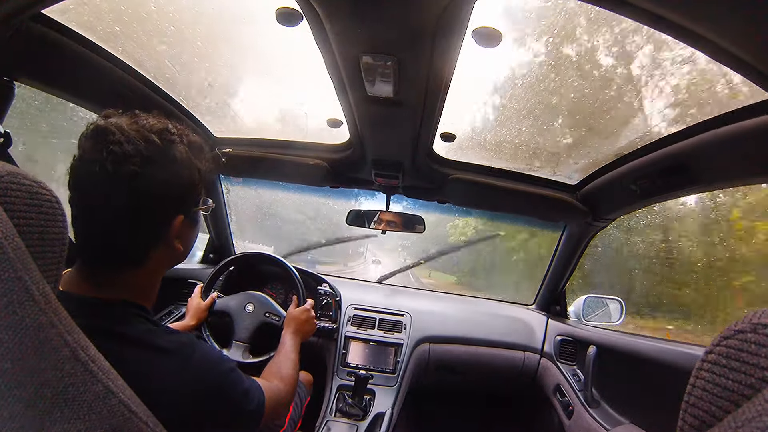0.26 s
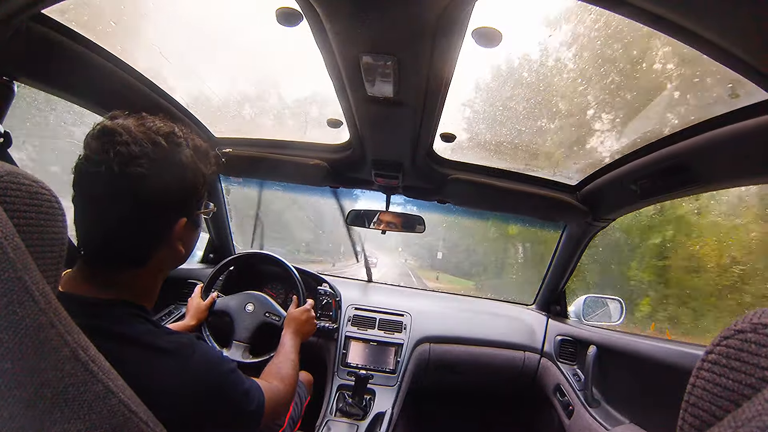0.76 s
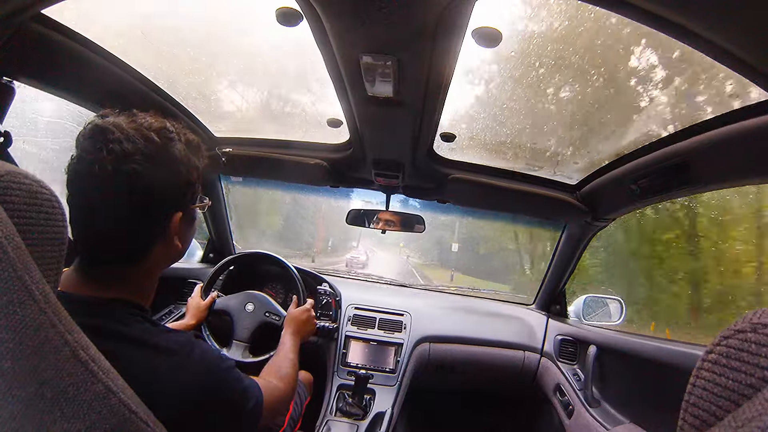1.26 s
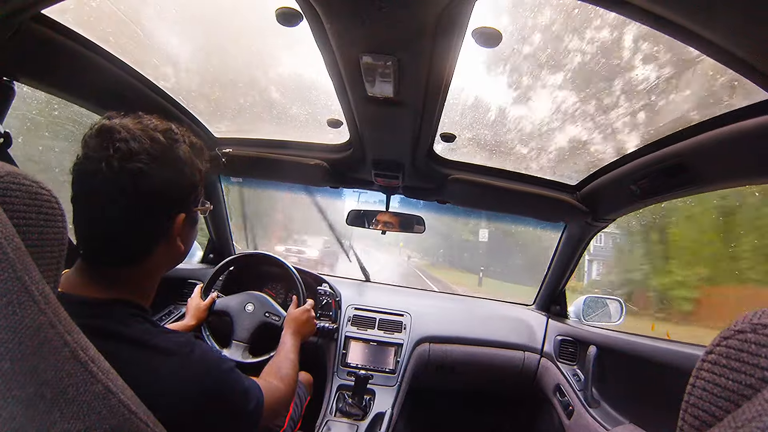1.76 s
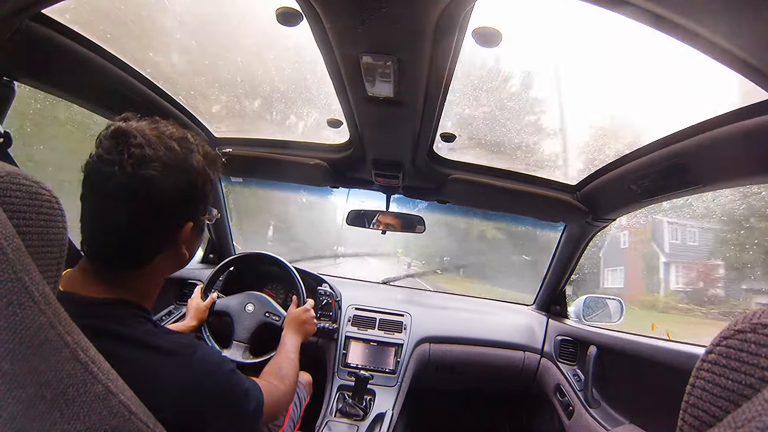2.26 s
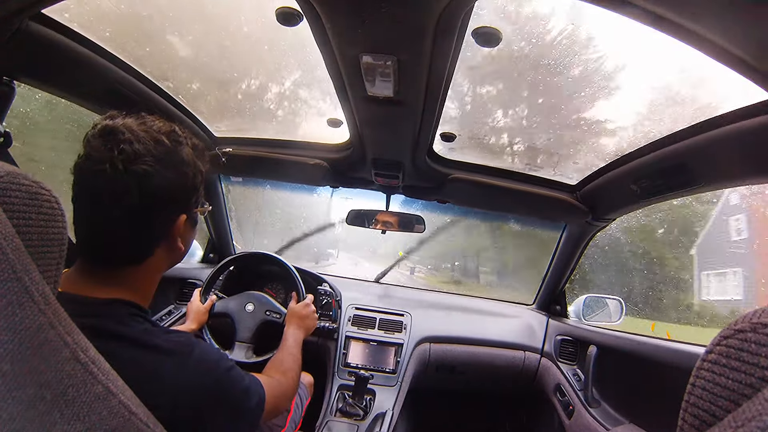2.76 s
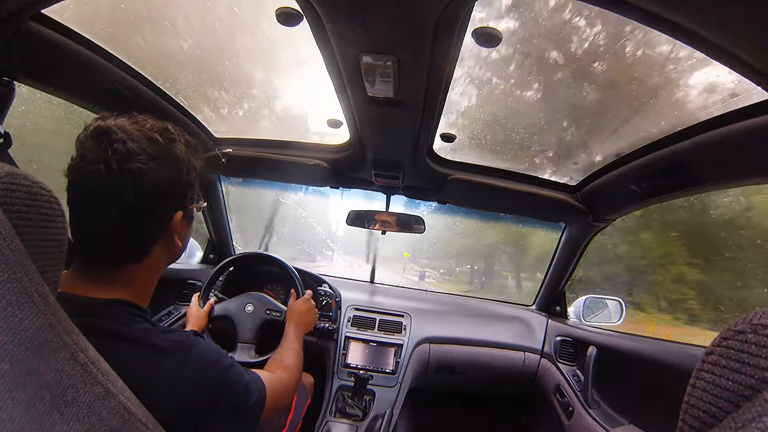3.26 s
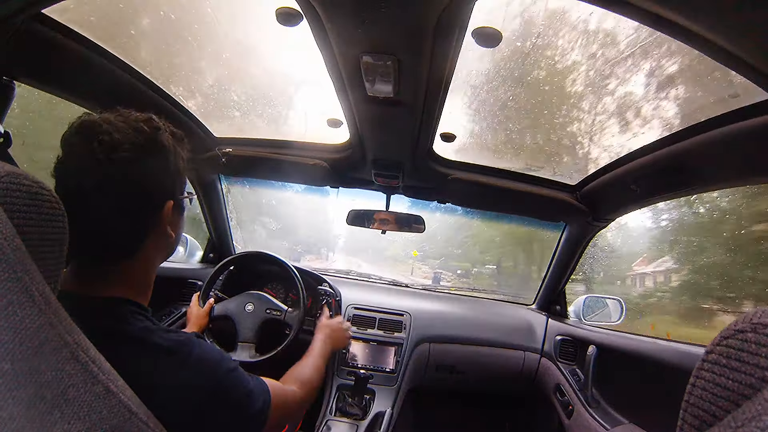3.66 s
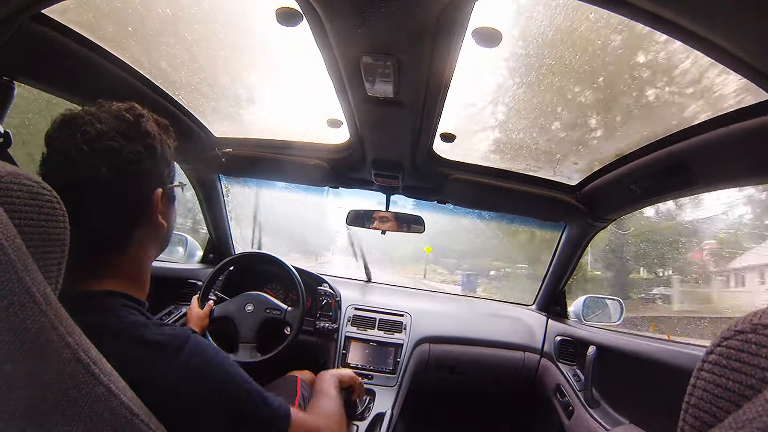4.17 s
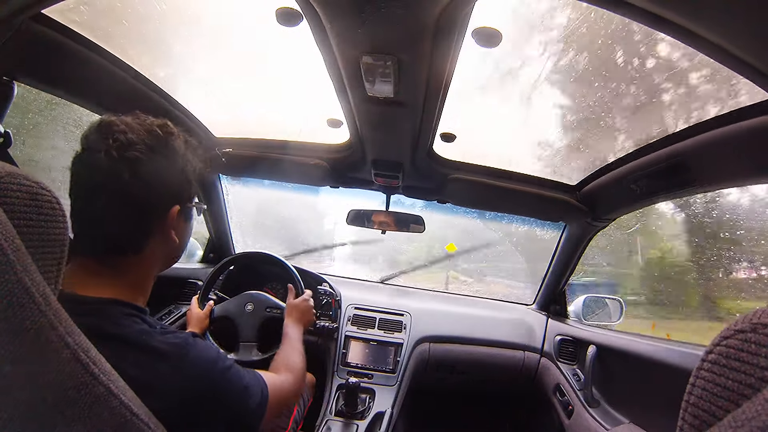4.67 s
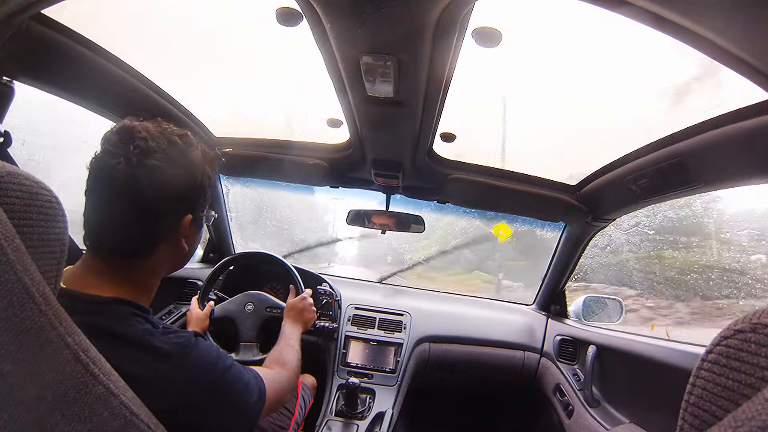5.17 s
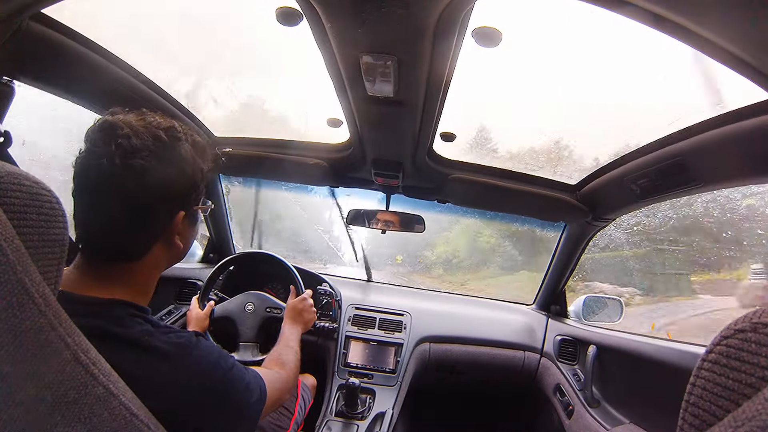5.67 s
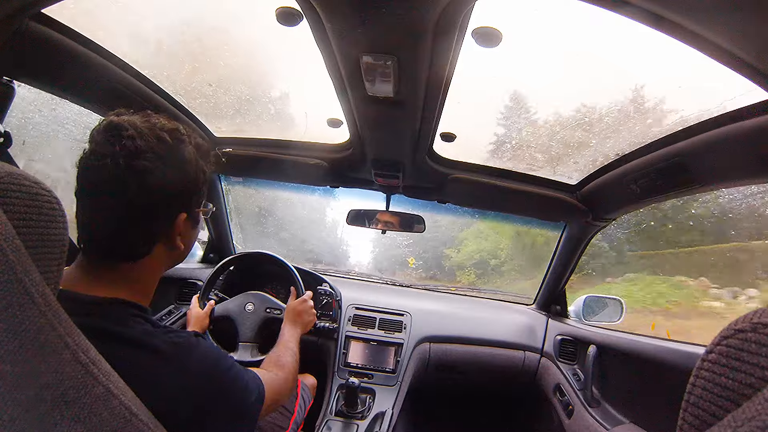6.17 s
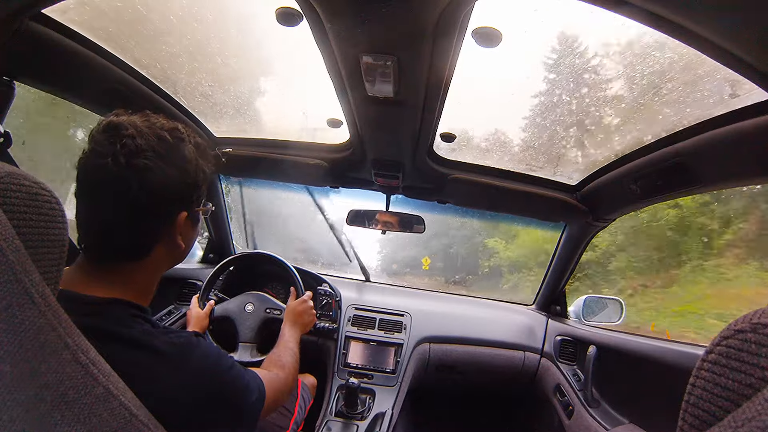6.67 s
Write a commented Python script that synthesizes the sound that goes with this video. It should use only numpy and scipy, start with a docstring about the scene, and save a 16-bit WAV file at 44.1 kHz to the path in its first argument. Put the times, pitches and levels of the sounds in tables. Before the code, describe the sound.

Inside a closed car driving in rain, a smooth six-cylinder drone climbs slowly over deep road rumble, muffled tyre roar and faint spray hiss. Sparse drops tick on the glass roof and tiny wiper squeaks appear. After three seconds drops patter thickly, then the throttle blips with a brief throaty lope. The engine settles higher and softer in the shorter gear until the end. Close, dry cabin microphone, one channel.

```python
"""Inside a six-cylinder car on a wet road: sines at the firing rate and its orders drone and slowly climb.
Under them noise bands make road rumble, tyre roar and spray; a shaft hums, noise bursts are rain on the glass roof.
Narrow whistles squeak as the wiper blades turn, early on, after the blip and near the end.
From 3.3 s heavy drops fall thickly from the trees; at 4 s the driver blips the throttle and shifts down.
The engine lopes with the clutch out, then drones on higher in the short gear."""
import sys
import numpy as np
from scipy import signal
from scipy.fft import rfft, irfft, next_fast_len
from scipy.io import wavfile
from scipy.ndimage import uniform_filter1d

SR = 44100
rng = np.random.default_rng(int(sys.argv[2]) if len(sys.argv) > 2 else 0)


def to_linear_factor(level_db):
    """Convert decibel levels (scalar or array-like) to linear amplitude factors."""
    exponent = np.asarray(level_db, float) / 20
    return 10 ** exponent


def waveform_to_disk(signal):
    """Save audio, clipped to [-1, 1], as 16-bit WAV at the path in sys.argv[1]."""
    frames = np.transpose(np.atleast_2d(signal))
    scaled = np.clip(frames, -1, 1) * 32767
    samples = np.round(scaled).astype(np.int16)
    wavfile.write(sys.argv[1], SR, samples)


N = 305603

# engine speed: (time [s], firing rate [1/s])
FIRING_RATE = [(0.0, 83.5), (0.3, 84.1), (2.1, 89.9), (3.0, 91.1), (3.6, 91.5), (3.9, 90.8), (4.1, 100.4),
               (4.15, 117.5), (4.25, 127.3), (4.44, 118.5), (4.67, 129), (4.86, 118.6), (5.0, 117.5),
               (6.25, 119.8), (6.93, 120.5)]
# main exhaust tones: (time [s], firing tone level [dB], octave level [dB])
EXHAUST_TONES = [(0.0, -28, -42), (0.7, -26, -37), (1.2, -27, -38.5), (2.1, -22, -41), (3.0, -21.5, -43),
                 (3.6, -21.5, -40.5), (3.85, -22, -43), (3.96, -27, -53), (4.02, -37.5, -64),
                 (4.08, -40, -52), (4.16, -40, -40), (4.26, -44, -50), (4.3, -43.5, -53.5),
                 (4.46, -47, -54), (4.59, -36.5, -41), (4.7, -36.5, -50.5), (4.77, -43, -47),
                 (4.85, -37, -39), (5.25, -33.5, -39), (6.25, -31, -39.5), (6.93, -30.5, -39.5)]
# orders left by uneven cylinders: (multiple of the six-firing cycle, tall gear level [dB], short gear level [dB])
CYCLE_ORDERS = [(4, -49, -52), (5, -51, -48), (7, -57, -55), (8, -66, -51), (10, -60, -59), (11, -51, -63),
                (13, -66, -62), (14, -57, -57), (15, -57, -54), (16, -62, -59), (17, -65, -63),
                (18, -58, -66), (19, -72, -69), (20, -65, -65), (21, -69, -75), (22, -69, -71),
                (23, -76, -66), (24, -62, -62), (25, -67, -77), (26, -67, -73), (27, -71, -69),
                (29, -75, -77), (30, -73, -73), (32, -78, -71)]
# gear change: start and end [s]
GEAR_CHANGE = [4.0, 4.8]
# loping with the clutch out: (centre [s], length [s], bank beat level [dB], triple beat level [dB])
LOPES = [(3.988, 0.067, -47, -45), (4.091, 0.096, -30.5, -33), (4.209, 0.036, -27.5, -45),
         (4.271, 0.056, -25, -55), (4.453, 0.12, -32, -52), (4.62, 0.15, -47, -49)]
# floor rumble spectrum: (frequency [Hz], relative density [dB per Hz])
RUMBLE_SPECTRUM = [(10, -8), (20, 2.5), (28, 2), (34, -9), (45, -27)]
# road bumps: (centre [s], level [dB])
BUMPS = [(0.98, -29.5), (1.16, -28), (1.5, -37), (1.66, -34.5), (1.9, -32), (2.26, -33.5), (2.53, -27),
         (3.17, -30.5), (3.82, -31.5), (4.44, -32.5), (4.62, -28.5), (5.27, -33), (5.5, -38.5),
         (6.31, -32.5), (6.852, -39)]
# drive shaft: (time [s], turns [1/s], level [dB])
SHAFT = [(0, 37, -47), (.7, 38, -47), (2.3, 39.9, -39), (3.9, 40.5, -38), (5.1, 39.3, -41),
         (6.3, 39.8, -38), (6.93, 40.2, -40)]
# body boom spectrum: (frequency [Hz], relative density [dB per Hz])
BOOM_SPECTRUM = [(28, -13.5), (36, -4), (55, -7.5), (75, -3), (110, -3.5), (150, -6.5), (200, -14),
                 (300, -24)]
# tyre roar spectrum: (frequency [Hz], relative density [dB per Hz])
ROAR_SPECTRUM = [(110, -34.5), (190, -18.5), (222, -4), (317, -9), (385, -11.5), (599, -18.5), (831, -16),
                 (911, -19.5), (1010, -19), (1550, -32), (2200, -50), (2860, -73), (4840, -120)]
# cabin resonances added to the roar: (frequency [Hz], width [Hz], gain [dB])
CABIN_MODES = [(384.7, 11, -9), (465, 120, -5), (668, 53, -6.5), (833, 63, -0.5), (1003, 32, -2.5)]
# tyre roar: (time [s], level [dB])
ROAR_LEVEL = [(0, -49), (1.1, -47.5), (1.6, -49), (2.3, -48.5), (3.1, -49), (3.7, -46.5), (4.0, -48),
              (4.5, -48.5), (5.0, -48), (6.2, -49), (6.93, -46.5)]
# heavy drops: (time [s], peak level [dB rms], centre frequency [Hz], splash relative to it [dB])
HEAVY_DROPS = [(0.15, -57.5, 3100, -17), (0.326, -59, 3300, -16), (0.39, -60, 3200, -20),
               (0.553, -61.5, 3000, -22), (0.622, -63, 4200, -23), (0.755, -60.5, 4590, -7),
               (0.7759, -64, 3430, -23), (1.612, -62.5, 4730, -14), (1.7966, -62, 5400, -13),
               (2.3226, -63, 4090, -14), (2.341, -59.5, 4730, -17), (2.3724, -62.5, 3450, -13),
               (3.086, -61.5, 3600, -18), (3.2797, -61.5, 4490, -21), (3.3354, -53.5, 3550, -21),
               (3.3445, -58, 4340, -17), (3.353, -56.5, 3790, -14), (3.417, -62, 4180, -10),
               (3.439, -57, 5170, -12), (3.449, -53.5, 4460, -13), (3.474, -51.5, 3380, -18),
               (3.5007, -58, 4500, -14), (3.538, -58.5, 2900, -18), (3.6042, -60.5, 3950, -20),
               (3.623, -62, 4360, -19), (3.652, -59, 4160, -16), (3.685, -54, 3890, -16),
               (3.6971, -52.5, 3900, -13), (3.721, -56, 3260, -17), (3.741, -61, 4550, -18),
               (3.788, -61.5, 4390, -13), (3.817, -62, 4900, -11), (3.841, -54, 4170, -15),
               (3.922, -59, 3500, -16), (3.969, -51.5, 4660, -18), (4.201, -60.5, 5400, -12),
               (4.283, -61, 2910, -26), (5.116, -63.5, 4180, -18), (5.255, -63, 5420, -13),
               (6.3907, -62, 4850, -17), (6.636, -64, 3330, -16), (6.815, -64, 4800, -20)]
# rain on the car, heavier under the trees: (time [s], spray level [dB], lesser drops [1/s])
SHOWER = [(0, -65, 6), (1.3, -66, 5), (2.2, -64.5, 4), (3.0, -64.5, 8), (3.3, -65, 60), (3.62, -62.5, 110),
          (3.85, -66, 40), (4.05, -65, 3), (5.3, -66.5, 3), (6.3, -66, 3), (6.93, -64.3, 3)]
# rain and spray spectrum: (frequency [Hz], relative density [dB per Hz])
SPRAY_SPECTRUM = [(940, -24.5), (1600, -7), (1740, 1.5), (2130, -4.5), (3370, -0.5), (3830, -4), (5590, -5),
                  (6530, -13.5), (7230, -11), (9010, -18), (12300, -19), (13000, -25), (14400, -40.5)]
# wiper squeaks: (time [s], level before the last resonance [dB], frequency [Hz], length [s])
SQUEAKS = [(0.656, -67.5, 3300, 0.026), (1.848, -68, 3650, 0.012), (1.867, -64, 3470, 0.024),
           (1.895, -63.5, 3470, 0.02), (1.912, -70, 3300, .012), (4.33, -69, 3450, 0.041),
           (6.777, -69.5, 3330, 0.044)]


def in_time(rows):
    """Table columns joined by straight lines, one value a sample."""
    s, *columns = np.transpose(rows)
    return [np.interp(np.arange(N) / SR, s, column) for column in columns]


def rms_one(x):
    """Scale to unit power."""
    return x / np.sqrt(np.mean(x ** 2) + 1e-20)


def drift(rate_hz):
    """Slow random wander of spread 1: noise through two equal poles, run at every 40th sample."""
    r = np.exp(-2 * np.pi * rate_hz * 40 / SR)
    noise = rng.standard_normal(N // 40 + 2002)
    slow = signal.lfilter([1], [1, -2 * r, r * r], noise)[2000:]   # skip the filter's start
    return np.interp(np.arange(N) / 40, np.arange(len(slow)), rms_one(slow))


def swell(s, length_s):
    """A rounded rise and fall of height 1 around a moment."""
    return np.exp(-(2 * (np.arange(N) / SR - s) / length_s) ** 4)


def resonance(x, hz, width_hz):
    """Two-pole peak with gain 1 on top."""
    r = np.exp(-np.pi * width_hz / SR)
    poles = [1, -2 * r * np.cos(2 * np.pi * hz / SR), r * r]
    return signal.lfilter([(1 - r * r) / 2, 0, (r * r - 1) / 2], poles, x + 1e-18)


def noise_band(hz, width_hz, length):
    """Noise through the same resonance twice; rms 1."""
    once = resonance(rng.standard_normal(length), hz, width_hz)
    return rms_one(resonance(once, hz, width_hz))


def colour(x, spectrum):
    """Shape a signal by a (Hz, dB) spectrum; rms 1."""
    size = next_fast_len(N)
    hz, db = np.transpose(spectrum)
    bins = np.maximum(np.fft.rfftfreq(size, 1 / SR), 1)
    gain = to_linear_factor(np.interp(np.log(bins), np.log(hz), db, left=-90, right=-90))
    return rms_one(irfft(rfft(x, size) * gain, size)[:N])


def engine(waver_db=0.5, cycle_waver_db=1.0, beat_waver_db=5.0):
    """Sines locked to the firing phase: firing tone, octave, one bank's beat, and weaker orders of the cycle."""
    rate, = in_time(FIRING_RATE)
    phase = 2 * np.pi * np.cumsum(rate) / SR
    out = np.zeros(N)
    for order, level_db in zip([1, 2], in_time(EXHAUST_TONES)):
        out += to_linear_factor(level_db + waver_db * order * drift(14.0)) * np.sin(order * phase)

    # the bank's beat at half the firing rate, and three times that beat, swell up in the lopes
    beat = to_linear_factor(-48.5 + beat_waver_db * drift(1.9))
    triple = to_linear_factor(-59 + beat_waver_db * drift(1.3))
    for s, length_s, beat_db, triple_db in LOPES:
        beat += to_linear_factor(beat_db) * swell(s, length_s)
        triple += to_linear_factor(triple_db) * swell(s, length_s)
    out += beat * np.sin(phase / 2) + triple * np.sin(3 * phase / 2)

    # the weaker orders cross from gear to gear and sink while the clutch is out
    start_s, end_s = GEAR_CHANGE
    shifted = np.interp(np.arange(N) / SR, GEAR_CHANGE, [0, 1])
    unloaded_db = -5.5 * swell(np.mean(GEAR_CHANGE), end_s - start_s)
    for multiple, tall_db, short_db in CYCLE_ORDERS:
        gear_db = tall_db + shifted * (short_db - tall_db)
        level_db = gear_db + unloaded_db + cycle_waver_db * drift(3.6)
        out += to_linear_factor(level_db) * np.sin(multiple * phase / 6 + rng.uniform(0, 2 * np.pi))
    return np.sqrt(2) * out   # levels above are rms


def floor_rumble(steady_db=-40.5, bump_s=0.1):
    """Lumpy low noise in the floor pan, swelling at each road bump."""
    noise = colour(rng.standard_normal(N), RUMBLE_SPECTRUM)
    level = to_linear_factor(steady_db + 2.0 * drift(3.0))
    for s, db in BUMPS:
        level += to_linear_factor(db) * swell(s, bump_s)
    # even out the noise's own power so that the swells follow the bumps
    own_power = uniform_filter1d(noise ** 2, size=SR // 8)
    return level * noise / np.sqrt(own_power + 0.076)


def drive_shaft():
    """A sine at the turning rate of the shaft."""
    turns_hz, level_db = in_time(SHAFT)
    return np.sqrt(2) * to_linear_factor(level_db) * np.sin(2 * np.pi * np.cumsum(turns_hz) / SR)


def body_boom(level_db=-41.5):
    """Low noise booming in the car body, its level drifting slightly."""
    return colour(rng.standard_normal(N), BOOM_SPECTRUM) * to_linear_factor(level_db + 1.0 * drift(3.5))


def tyre_roar():
    """Steadier noise from the tyres, coloured by the cabin's resonances."""
    roar = colour(rng.standard_normal(N), ROAR_SPECTRUM)
    modes = sum(to_linear_factor(db) * resonance(roar, hz, width_hz) for hz, width_hz, db in CABIN_MODES)
    level_db = in_time(ROAR_LEVEL)[0] + 0.5 * drift(11.0)
    return rms_one(roar + modes) * to_linear_factor(level_db)


def drops(width_share=0.53, rise_s=0.00054, lead_s=0.003, hold_s=0.002, t60_s=0.03):
    """Each drop is a noise burst around its own pitch, with a brighter splash, a pane ring and a duller tap."""
    out = np.zeros(N + SR)
    t = np.arange(int(0.08 * SR)) / SR - lead_s
    shape = to_linear_factor(-60 * np.maximum(t - hold_s, 0) / t60_s) * np.exp(np.minimum(t, 0) / rise_s)
    for s, peak_db, hz, splash_db in HEAVY_DROPS + lesser_drops():
        burst = noise_band(hz, width_share * hz, len(t))
        burst += to_linear_factor(splash_db) * noise_band(10000, 6000, len(t))
        burst += to_linear_factor(-9) * noise_band(2500, 1500, len(t))   # tap
        burst += to_linear_factor(-7) * noise_band(5500, 1300, len(t))   # pane
        i = max(round((s - lead_s) * SR), 0)
        out[i:i + len(t)] += to_linear_factor(peak_db) * shape * burst
    return out[:N]


def lesser_drops(low_db=-69, high_db=-64, low_hz=2800, high_hz=5300, splash_db=-16, count=400):
    """Chance drops that come as thickly as the shower says, as rows like the heavy ones."""
    gap, size, pitch = rng.random((count, 3)).T
    # random gaps counted in drops, turned into seconds by the running total of the shower
    arrivals = np.cumsum(-np.log(1 - gap))
    fallen = np.cumsum(in_time(SHOWER)[1]) / SR
    s = np.interp(arrivals, fallen, np.arange(N) / SR, right=np.inf)
    level_db = low_db + size * (high_db - low_db)
    hz = low_hz * (high_hz / low_hz) ** pitch
    rows = np.transpose([s, level_db, hz, np.full(count, splash_db)])
    return [tuple(row) for row in rows[np.isfinite(s)]]


def spray_and_rain(per_s=500, spread_db=1.5, share_db=-6, splash_s=0.0035, width_share=0.65):
    """Spray hiss with small drops: each opens a short noise burst around one of seven pitches."""
    chance = per_s * to_linear_factor(3.0 * drift(12.0)) / SR
    sizes = to_linear_factor(spread_db * np.minimum(rng.exponential(1, N), 2)) * (rng.random(N) < chance)
    fade = np.exp(-1 / (splash_s * SR))
    noise = rng.standard_normal(N)
    pitches_hz = np.geomspace(2000, 12000, num=7)
    dealt = rng.integers(0, len(pitches_hz), N)   # which pitch a drop gets
    bursts = np.zeros(N)
    for k, hz in enumerate(pitches_hz):
        envelope = signal.lfilter([1], [1, -fade], sizes * (dealt == k))
        bursts += resonance(envelope * noise, hz, width_share * hz)
    hiss = rng.standard_normal(N)
    level_db = in_time(SHOWER)[0] + 0.48 * drift(3.1)
    return to_linear_factor(level_db) * colour(hiss + to_linear_factor(share_db) * rms_one(bursts), SPRAY_SPECTRUM)


def wipers(width_hz=80, upper_ratio=1.13, upper_db=-3, steady=0.46):
    """Rubber shudders on wet glass as the blade turns: two narrow neighbouring whistles of noise and sine."""
    out = np.zeros(N)
    t = np.arange(N) / SR
    noise = rng.standard_normal(N)

    def whistle(hz):
        """Narrow noise around a steady sine."""
        return rms_one(resonance(noise, hz, width_hz)) + steady * np.sin(2 * np.pi * hz * t)

    for s, db, hz, length_s in SQUEAKS:
        pair = whistle(hz) + to_linear_factor(upper_db) * whistle(upper_ratio * hz)
        out += to_linear_factor(db) * swell(s, length_s) * resonance(pair, 1.05 * hz, 1100)
    return out


def scene():
    """Everything as heard in the closed cabin, in one channel."""
    road = floor_rumble() + drive_shaft() + body_boom() + tyre_roar()
    rain = drops() + spray_and_rain()
    return (engine() + road + rain + wipers())[None]


def band_limit(x):
    """A steep low-pass at the top of the band."""
    return signal.sosfilt(signal.butter(12, 14550, fs=SR, output="sos"), x)


def record(dry):
    """Deliver the finished mix."""
    return band_limit(dry)


dry = scene()
out = record(dry)
waveform_to_disk(out)
```